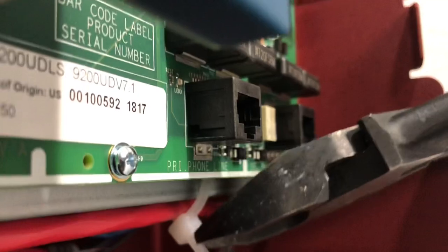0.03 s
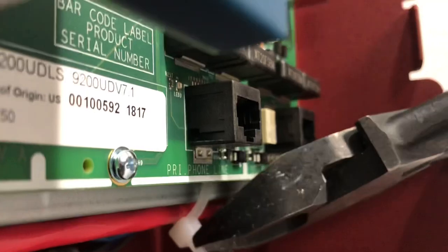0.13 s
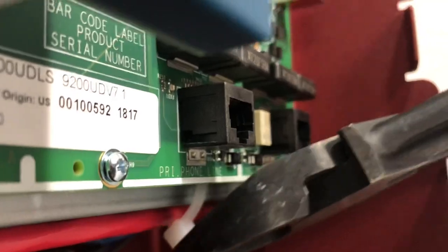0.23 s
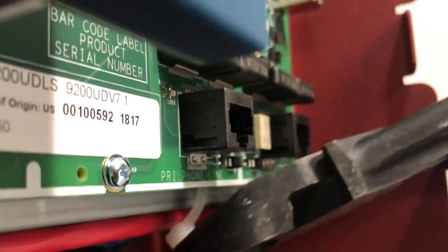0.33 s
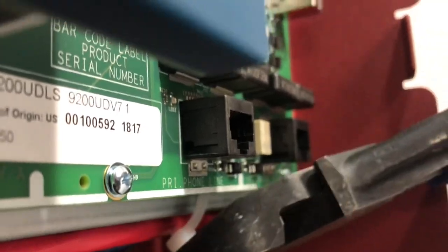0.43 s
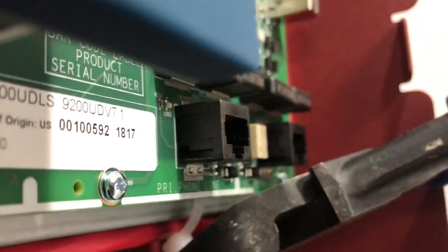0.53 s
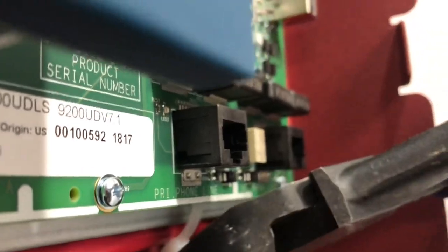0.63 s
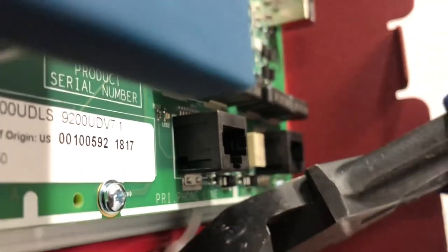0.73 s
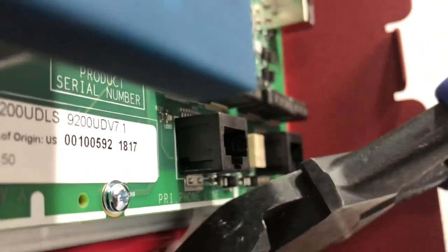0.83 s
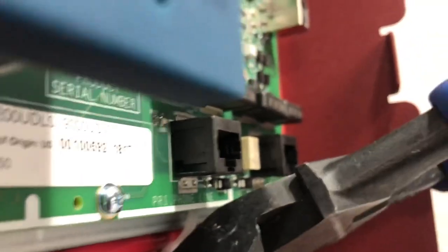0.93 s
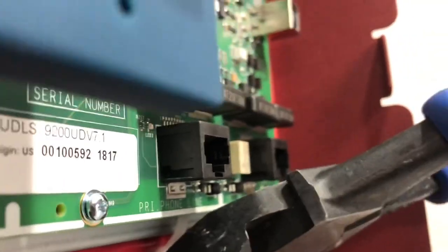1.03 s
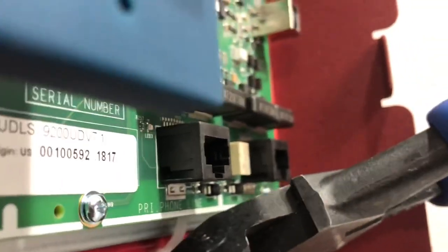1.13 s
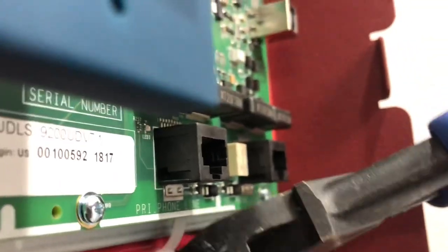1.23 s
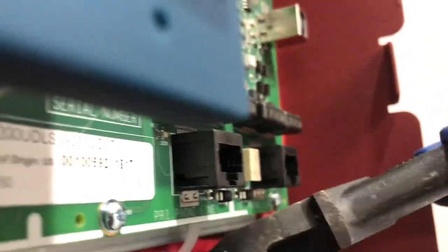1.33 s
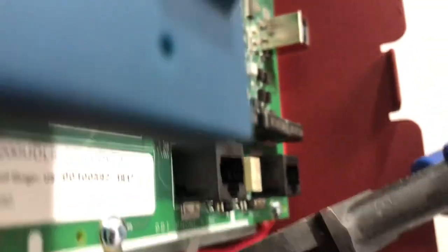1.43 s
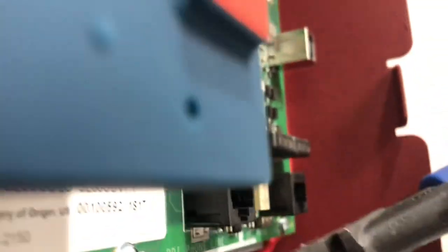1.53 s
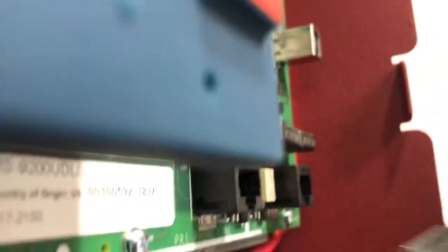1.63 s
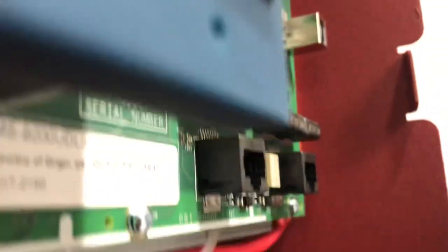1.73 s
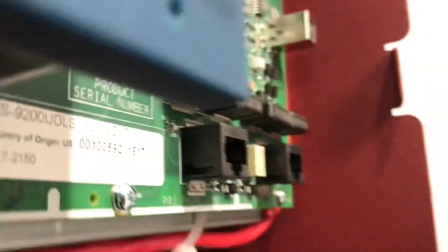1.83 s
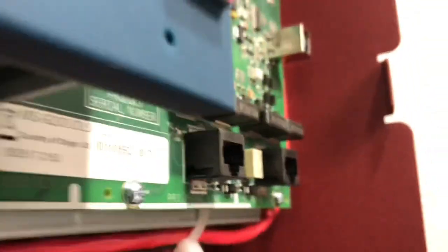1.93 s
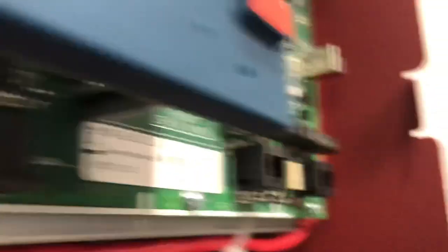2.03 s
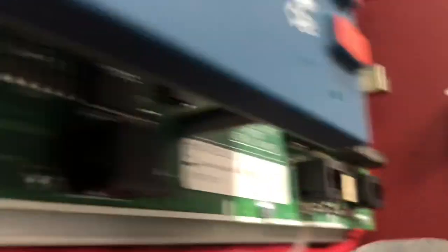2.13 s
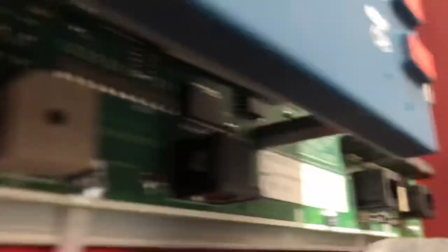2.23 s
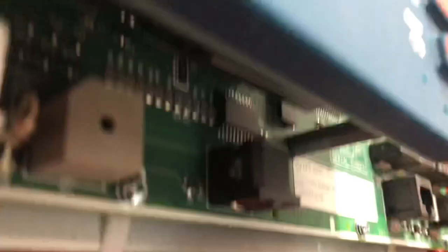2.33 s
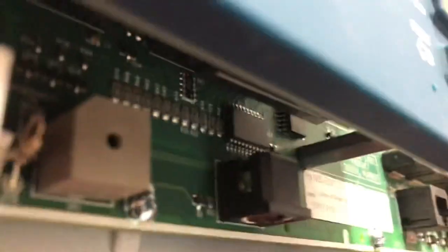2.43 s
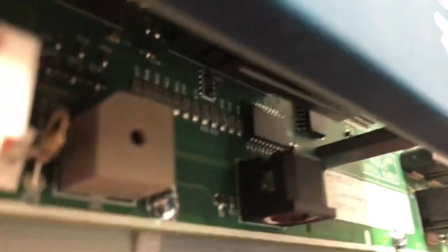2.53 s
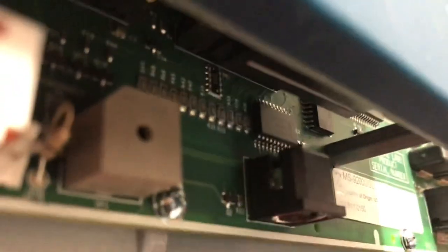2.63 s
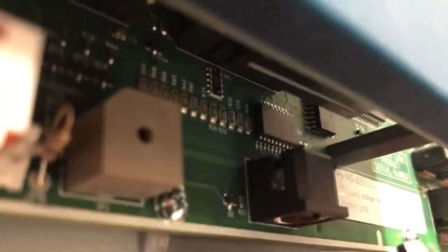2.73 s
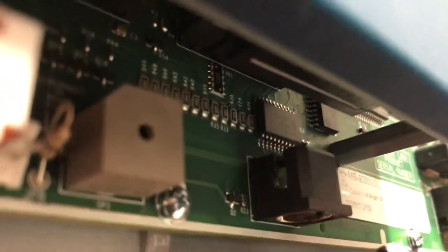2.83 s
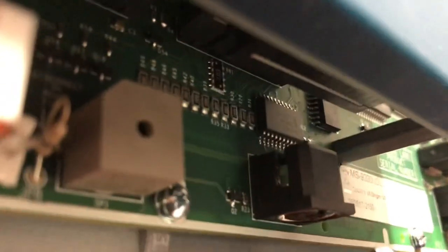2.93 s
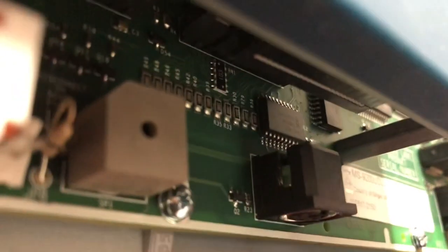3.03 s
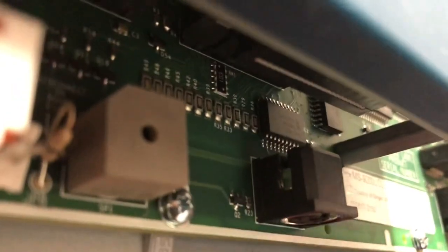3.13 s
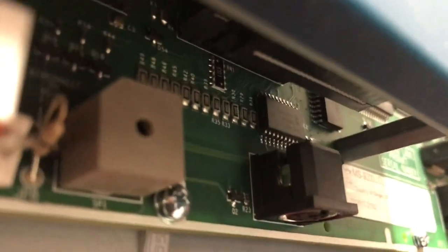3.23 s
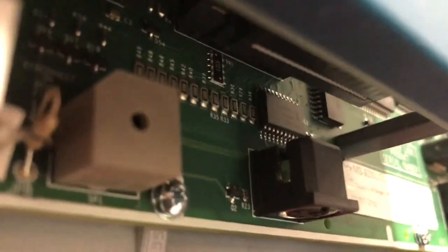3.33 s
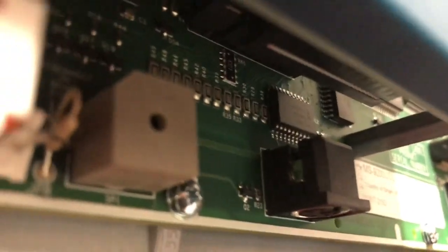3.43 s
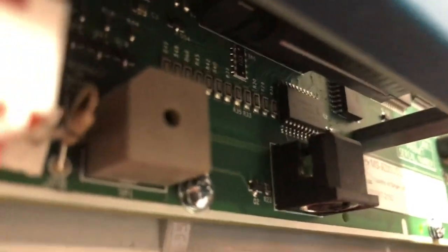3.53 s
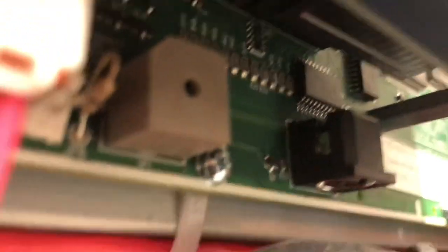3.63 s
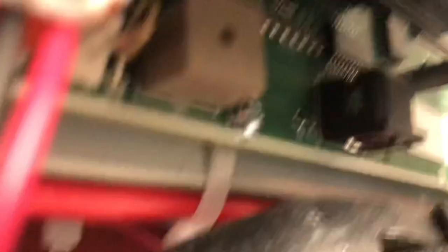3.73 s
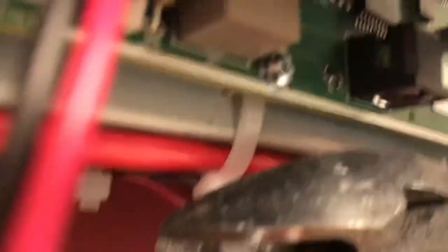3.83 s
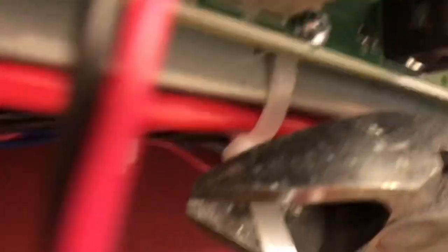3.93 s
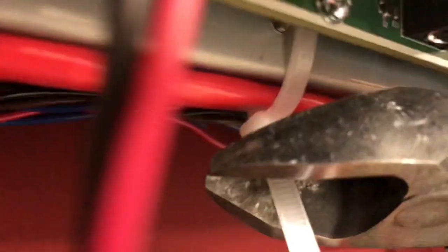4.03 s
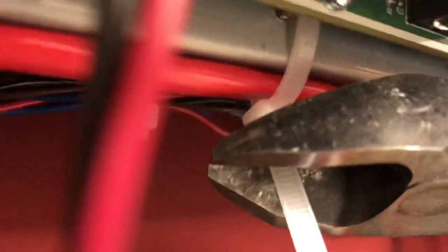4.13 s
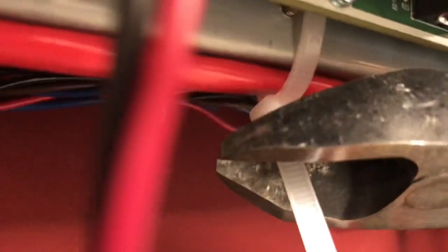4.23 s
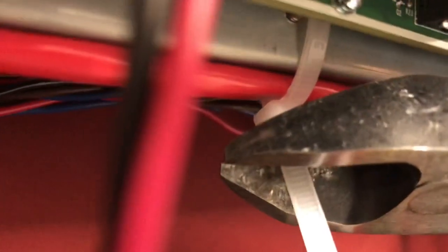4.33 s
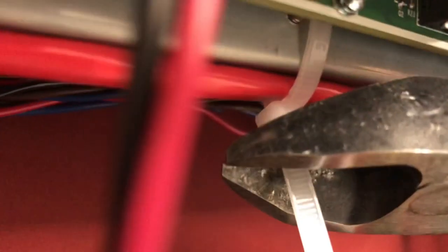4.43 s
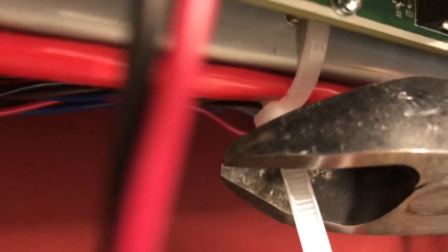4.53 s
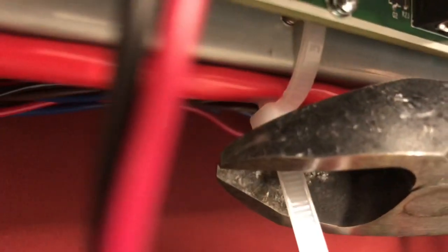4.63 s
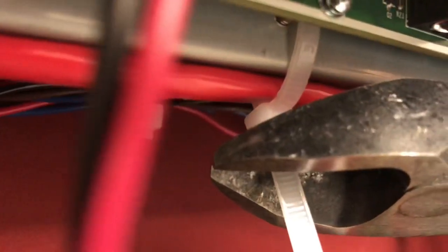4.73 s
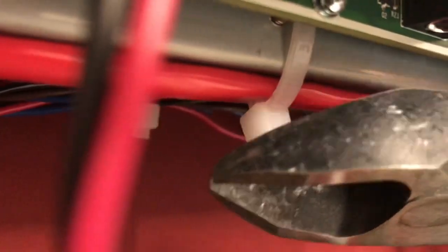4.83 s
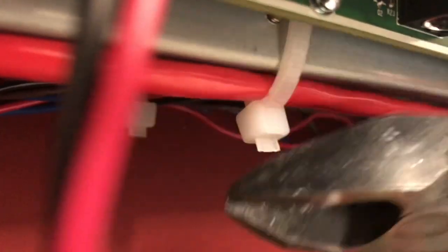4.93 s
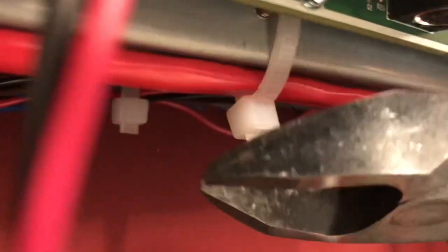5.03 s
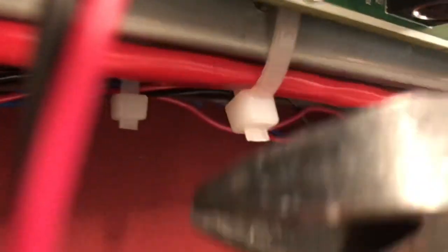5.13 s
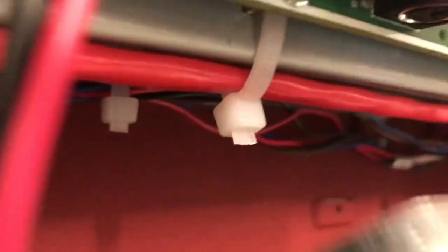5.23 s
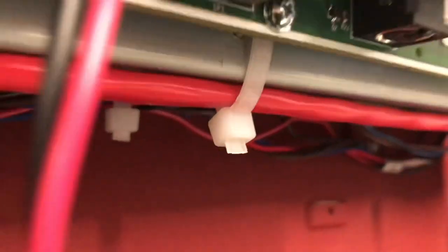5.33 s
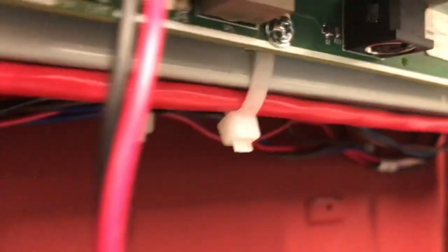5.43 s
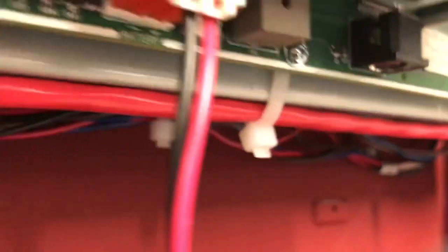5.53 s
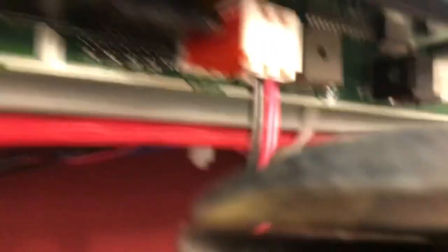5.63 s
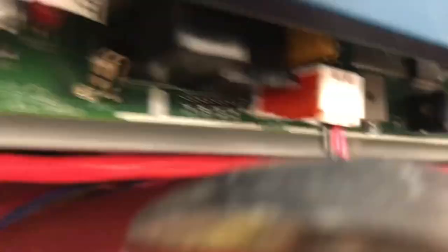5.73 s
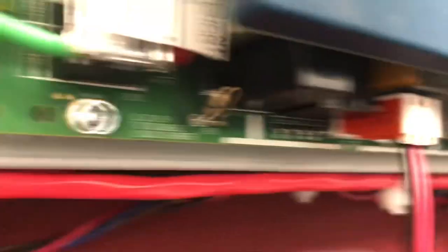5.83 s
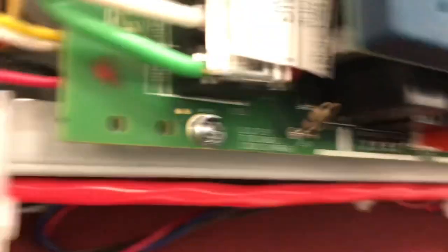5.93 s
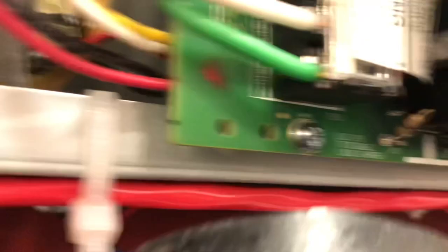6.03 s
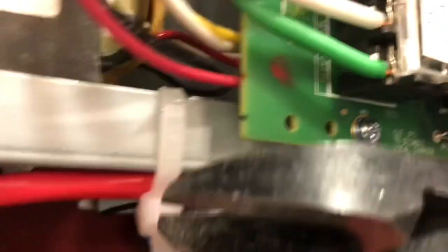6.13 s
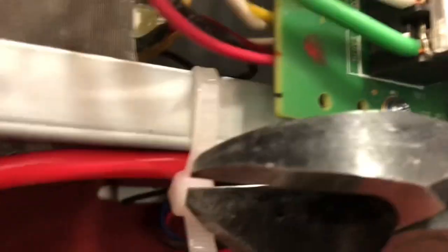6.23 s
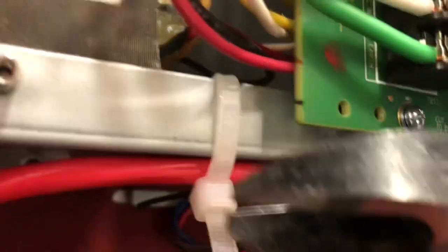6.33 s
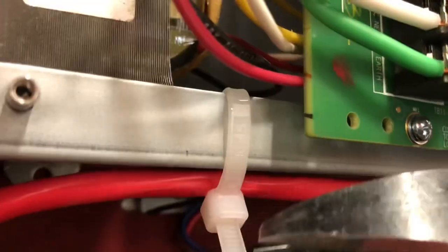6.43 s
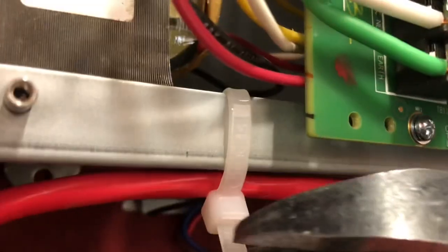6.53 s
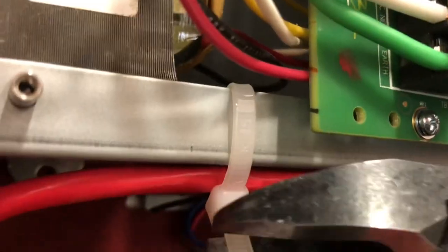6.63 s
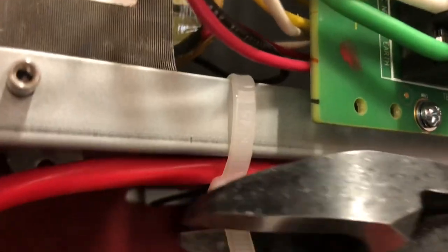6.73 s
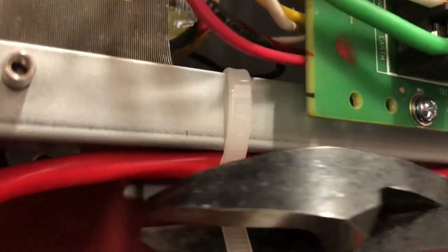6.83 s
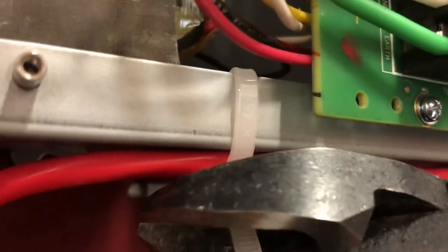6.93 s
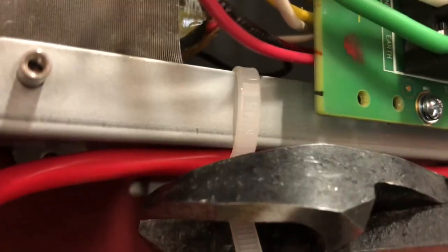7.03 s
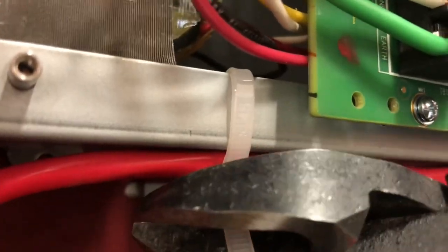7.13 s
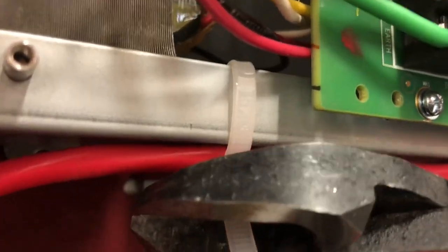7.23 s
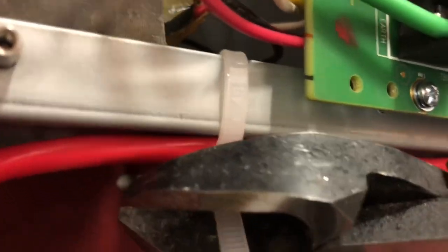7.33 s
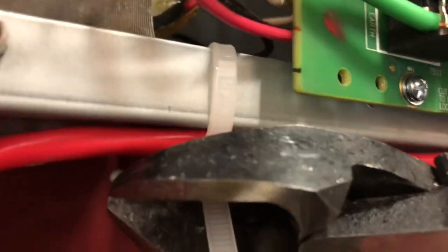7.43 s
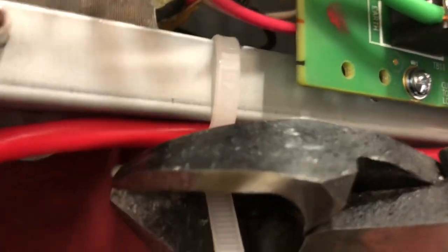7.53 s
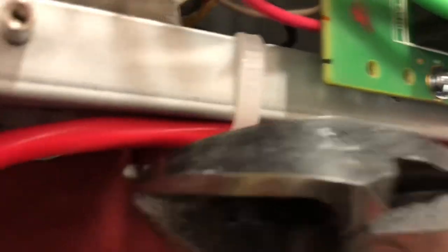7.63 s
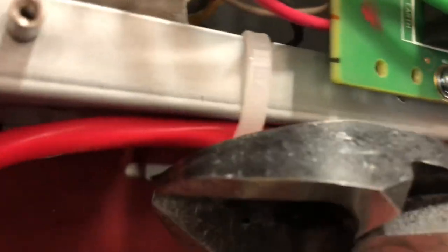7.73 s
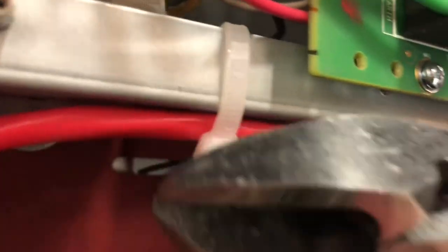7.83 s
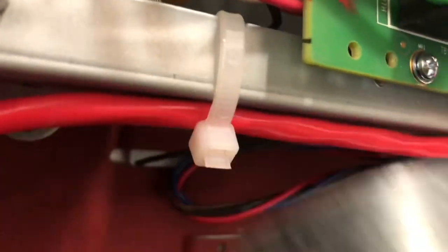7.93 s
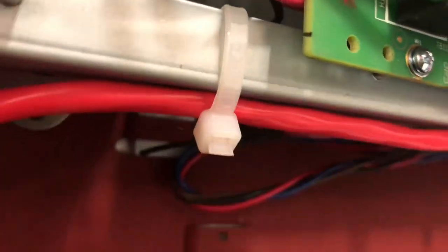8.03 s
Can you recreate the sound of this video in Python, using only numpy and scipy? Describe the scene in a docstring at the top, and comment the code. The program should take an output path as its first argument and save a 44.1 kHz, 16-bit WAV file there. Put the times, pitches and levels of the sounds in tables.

```python
"""Three nylon cable ties snap under side cutters inside a steel cabinet: short falling chirps plus torn noise
drive the resonances of strap and jaws. The freed bundle lands as noise thumps and rings the metal.
Between cuts, damped modes and noise bursts make bumps, knocks and ticks; shaped noise makes scrapes and rubs.
Ventilation noise and hum lie behind. A gain control ducks whenever the level is too high, as at a snap,
and recovers slowly."""
import sys
import numpy as np
from scipy import signal
from scipy.fft import rfft, irfft, next_fast_len
from scipy.io import wavfile
from scipy.ndimage import uniform_filter1d, map_coordinates

SR = 44100
rng = np.random.default_rng(int(sys.argv[2]) if len(sys.argv) > 2 else 0)


def master(y):
    """Save y as 16-bit WAV."""
    cut = np.clip(np.atleast_2d(y).T, -1, 1)
    pcm = np.round(cut * 32767)  # scale
    wavfile.write(sys.argv[1], SR, pcm.astype(np.int16))


N = 356019
CLOCK = np.arange(N) / SR  # scene time, s
AGE = np.arange(SR // 2) / SR  # time since a blow, s

# Levels are relative: each layer adds its own trim. t60 is the time to fall by 60 dB.
# Snaps
# ties cut [t/s, snap level/dB, tearing level/dB, tearing t60/s, strap level/dB, blade f/Hz, blade level/dB,
#           whine f/Hz, whine level/dB]
CUTS = [(1.3906, 7, -5.5, .003, 1, 7570, 2, 2834, -30.5),
        (4.7931, 3.5, 1.5, 0.00964, -2.5, 7110, 0, 3122, -32.5),
        (7.5823, 3.5, -2.5, 0.011, 3, 7240, 2.5, 3112, -31)]
# faint ticks ahead of every snap [lead t/s, level/dB re the snap]
LEAD_TICKS = [(.0231, -30.5), (.0113, -39)]
# resonances of the cut strap [f/Hz, width/Hz before the least width is applied,
#                              level/dB before each cut's offset]
STRAP_RESONANCES = [(2240, 720, -13.5), (3430, 1900, -14.5), (4200, 630, -8), (4700, 400, -4.5),
                    (5170, 780, -5)]
# the jaws' fixed resonances [f/Hz, width/Hz, level/dB]
JAW_RESONANCES = [(6333, 700, -3.5), (9900, 720, -12), (14000, 5300, -15.5)]
# colour of a snap as it reaches the room [f/Hz, level/dB per Hz]
SNAP_SPRAY_SPECTRUM = [(300, -6), (1500, -0.5), (3000, -5.5), (4600, -4.5), (5800, -1), (7200, -2),
                       (9000, -2), (11000, -5.5), (13000, -6), (16000, -11.5)]
BREAK_S = .0007  # the break runs through the strap, its treble first
BLADE_WIDTH_HZ = 910  # the blades' main resonance, which shifts with the grip
NEAR_WALL_S, NEAR_WALL_DB = .0028, -16  # the cabinet's side throws each crack back
JAW_CLACK_S, JAW_CLACK_DB, JAW_CLACK_T60 = 4.871, -18, 0.024  # the jaws shut once after the second cut
WHINE_RISE_T60, WHINE_FALL_T60 = 0.032, .06  # s

# Recoils
# the freed bundle lands after each cut [flight t/s, thump level/dB, clank level/dB, rail level/dB,
#                                        back plate level/dB, shove level/dB]
RECOILS = [(0.016, -22.5, -22.5, -38.5, -20.5, -32.5), (0.0185, -26, -19.5, -23, -25.5, -55),
           (0.017, -17.5, -23.5, -28.5, -29, -28.5)]
# dull landing of the bundle [f/Hz, level/dB per Hz]
THUMP_SPECTRUM = [(25, -18), (60, 1), (140, 4.5), (320, 1), (450, -5), (600, -1.5), (800, -15),
                  (2000, -25.5), (8000, -59.5)]
# clank on metal [f/Hz, level/dB per Hz]
CLANK_SPECTRUM = [(200, -20.5), (600, 1.5), (850, -8), (1230, 5), (1500, -5.5), (2300, -13), (3200, -12.5),
                  (4200, -23), (12000, -40)]
# mounting rail modes [f/Hz, level/dB, t60/s]
RAIL_MODES = [(543, -8.5, 0.29), (622, -6.5, 0.22), (856, -6.5, 0.15), (1117, -3, 0.078), (1255, 1.5, 0.17),
              (1400, -1.5, 0.061), (1635, -5.5, 0.14), (1993, -12, 0.11), (2180, -9, 0.13),
              (2395, -15.5, 0.16), (3230, -8.5, 0.098)]
# steel back plate modes [f/Hz, level/dB, t60/s]
PLATE_MODES = [(318.8, -2, .2), (384, -6.5, 0.068), (510, -7, 0.045), (566, -9.5, .14), (649, -6, .13),
               (885, -10.5, 0.076)]
# the whole cabinet gives as the bundle lands [f/Hz, level/dB, t60/s]
SHOVE_MODES = [(63, 1.5, 0.14), (42, -5, .15), (128, -1, 0.28)]
JOLT_DB = -3.5  # the jolt at the moment of the cut, re the bundle's landing

# Bumps on the cabinet
# blows [t/s, body level/dB, boom level/dB, boom ring time re an untouched wall, back plate level/dB,
#        clack level/dB, tick level/dB]
BUMPS = [(0.001, -30, -32.5, 1, -38, -34, -30), (0.028, -41, -42, 0.6, -38, -43, -51),
         (0.1, -52, -36.5, .3, -52, -58, -62), (0.13, -40, -43, .5, -41, -60, -62),
         (0.17, -32.5, -38.5, 0.57, -26.5, -40, -43), (0.183, -33, -32.5, 0.51, -43, -53, -49),
         (0.244, -36, -38, 1, -34.5, -37, -41), (0.3, -28, -34, 0.87, -25.5, -35, -34),
         (0.311, -33.5, -37, 0.92, -46, -48.5, -39), (2.115, -39, -43.5, 0.75, -60, -66, -63.5),
         (2.686, -25.5, -31.5, 0.85, -31, -21.5, -27), (2.724, -35.5, -46, 0.74, -39, -34, -50),
         (2.768, -42, -48, 0.51, -52, -51, -45.5), (2.81, -40, -40, 0.77, -53, -51, -53),
         (2.855, -47.5, -54, 0.73, -61, -50, -52.5), (5.293, -44, -58, 0.85, -65.5, -70, -55),
         (5.548, -40.5, -51.5, 0.57, -60, -39, -45), (6.127, -29, -40, 1, -37.5, -46, -49),
         (6.623, -26, -36, 0.753, -37.5, -33.5, -53), (6.659, -32, -37.5, 0.86, -50, -50, -61.5)]
# low wall modes [f/Hz, level/dB, t60/s of an untouched wall]
BOOM_MODES = [(58.7, -24, 0.95), (84.8, -13, 0.67), (120, -7, 0.51), (143.2, 1, 0.33), (180.3, -9, 0.45)]
# upper wall modes [f/Hz, level/dB, t60/s before the hand's muting]
BODY_MODES = [(211.6, 4.5, 0.24), (250.5, -1.5, 0.027), (259, -6.5, 0.42), (283, -11, 0.41),
              (322.8, 1, 0.24), (365, -3.5, 0.13), (419, -7, 0.14), (541, -25.5, 0.85), (561, -18, 0.32),
              (628, -11.5, 0.092)]
# a padded blow [f/Hz, level/dB per Hz]
THUD_SPECTRUM = [(25, -30), (70, -34), (130, 13.5), (320, 1), (450, -2), (600, 0.5), (800, -16),
                 (2000, -18), (8000, -36)]
# a harder contact [f/Hz, level/dB per Hz]
CLACK_SPECTRUM = [(150, -9), (400, -3), (620, 11.5), (800, 10), (1250, 8.5), (1700, 0), (3000, -7),
                  (6000, -21), (16000, -30)]
# a small hard contact [f/Hz, level/dB per Hz]
TICK_SPECTRUM = [(300, -9), (1500, -6), (3500, -2), (6000, -3.5), (9000, -9.5), (13000, -8), (16000, -15)]
# spells when a loose part buzzes [t/s, length t/s, level/dB]
RATTLES = [(0.178, 0.045, -3), (0.253, 0.093, 3), (2.685, 0.17, 2.5), (6.124, .06, -9), (6.633, .05, -7)]
# resonances of the loose part [f/Hz, width/Hz, level/dB]
LOOSE_PART_RESONANCES = [(10850, 520, -1), (11700, 510, 0), (13100, 900, -7.5)]
REBOUND_S, REBOUND_DB = .028, -8.5  # the hand settles again, softly, after each bump
MUTING = 0.67  # the hand shortens the ring of the upper wall modes by this factor

# Board knocks, catches, clinks and ticks
# knocks on the circuit board [t/s, knock level/dB, wall boom level/dB, contact level/dB]
KNOCKS = [(3.3276, -28.5, -46, -40), (3.642, -32, -44, -46), (3.6491, -34, -38, -45),
          (3.756, -45.5, -50, -50), (3.764, -41.5, -47, -53)]
# the board on its standoffs [f/Hz, level/dB, t60/s]
BOARD_MODES = [(170, -10.5, 0.14), (220, -5, 0.091), (286, -4, 0.18), (325.3, -1, 0.17),
               (423.5, -13.5, 0.26), (565, -15, 0.17), (690, -13, 0.062), (905, 0, 0.029),
               (980, -5.5, 0.045), (1210, -10.5, 0.034), (1410, -15, 0.033), (2080, -35, 0.034)]
# steel meets the board's edge [f/Hz, level/dB per Hz]
CONTACT_SPECTRUM = [(300, -10), (900, 5), (1300, 5), (2000, -7), (3400, -13.5), (4500, -27), (12000, -42)]
# the jaws catch and jump on a tie [t/s, bundle level/dB, cutting edge level/dB, pitch re the usual]
CATCHES = [(3.914, -46, -60, 1.2), (3.9224, -38.5, -51, 0.88), (3.929, -38, -52, 1.05),
           (3.936, -48, -53, 1.04), (3.9765, -36.5, -52, 1.02), (3.989, -41.5, -57, 1.15),
           (3.994, -42, -52, .9), (4.0024, -42, -43, 1.08), (4.012, -52, -49, 0.93),
           (4.0263, -45.5, -53, 1.2), (4.069, -50, -52, 1.5), (5.52, -54, -52, 0.64),
           (5.528, -51.5, -41.5, .85), (5.925, -50, -56, 1.08)]
# the tied bundle at its usual pitch [f/Hz, level/dB, t60/s]
BUNDLE_MODES = [(435, -4, 0.095), (577, -4, 0.08), (881, -3.5, 0.061), (1110, -3, 0.036),
                (1357, -9.5, 0.062), (1640, -5.5, 0.036)]
# the cutting edge on nylon at its usual pitch [f/Hz, width/Hz, level/dB]
EDGE_RESONANCES = [(2230, 830, -3), (3600, 730, 2), (4440, 800, -4), (6000, 1500, -11)]
# steel on steel [t/s, level/dB]
CLINKS = [(4.871, -21.5), (5.2899, -54)]
# the empty jaws [f/Hz, level/dB, t60/s]
STEEL_MODES = [(5750, -8, .018), (6330, 10.5, 0.015), (7000, 1, 0.0206)]
# light clicks of jaws and ties [t/s, level/dB, ring f/Hz, ring level/dB re the click]
TICKS = [(0.063, -42.5, 7200, -1), (0.091, -49, 7400, -2), (0.1087, -50, 6980, 4),
         (0.1782, -40.5, 11700, 8.5), (0.3107, -38, 8250, 6), (0.8303, -42, 6000, -4),
         (0.8899, -44.5, 6460, 2.5), (1.847, -28, 5000, 3), (1.88, -34, 5200, 3), (1.9106, -36, 5800, 7),
         (1.9308, -30, 7000, 3), (2.1514, -49, 13000, 2), (3.646, -50, 11000, 7), (3.913, -54, 6100, 4),
         (3.926, -49, 6100, 2), (3.951, -50, 5000, 4), (3.966, -51, 5100, 5), (4.154, -47, 6500, -6),
         (4.245, -63, 5027, -10.5), (5.2893, -43, 6640, -1), (5.3081, -34, 9500, -6),
         (5.6254, -43, 9200, -7), (6.055, -51, 5500, -3), (6.583, -51.5, 7500, -1),
         (6.6186, -35, 3800, -4.5), (7.0897, -50, 7000, -8), (8.0335, -35, 3600, -1)]
TICK_RING_WIDTH_HZ, TICK_RING_T60 = 1200, .04
FAINT_TICKS_PER_S, FAINT_TICK_DB, FAINT_SPREAD_DB = 2.3, -53.5, 6.5  # the tool fidgets; spread is +/- dB

# Scrapes and rubs
# the jaws drag over a tie [t/s, length t/s, hiss level/dB, rasp level/dB, hiss brightness/dB per octave]
SCRAPES = [(0.791, 0.17, -62, -67, 3), (1.858, 0.18, -53, -73, 3.5), (2.263, 0.058, -60, -58, -0.5),
           (3.925, 0.11, -52, -55, 6), (4.031, 0.058, -57.5, -55, 3.5), (4.158, 0.02, -54.5, -51, 2),
           (5.518, 0.026, -51, -51, -3.5), (5.917, 0.024, -49.5, -46.5, 1.5), (6.264, 0.08, -55, -69, 4.5),
           (6.716, 0.18, -65.5, -56, 0.5), (7.055, 0.067, -63, -72.5, 6)]
# bright friction [f/Hz, level/dB per Hz]
HISS_SPECTRUM = [(500, -23), (1600, 1), (3500, -1), (5500, -1.5), (7500, -3.5), (9500, -7), (12000, -8),
                 (16000, -11)]
# rough friction [f/Hz, level/dB per Hz]
RASP_SPECTRUM = [(200, -14), (430, -2), (750, -8), (950, -10), (1500, -12.5), (2300, -30.5), (4000, -29),
                 (10000, -38)]
# a hand slides along the cables [t/s, length t/s, final level/dB, swell over the stroke/dB, judder/dB]
RUBS = [(0, 1.53, -67, 8, 6), (1.72, 0.65, -66, -9.5, -1), (5.226, 0.293, -52.5, 12, 1.5),
        (5.582, 0.32, -53.5, 8.5, 2.5)]
# the rubbed spot sings as the grip shifts [t/s, low f/Hz, high f/Hz]
SQUEAL_GLIDES = [(5.3, 5160, 8700), (5.56, 3400, 9000), (5.943, 3060, 9900)]
# the cable jackets' colour under the hand [f/Hz, width/Hz, level/dB]
RUBBED_RESONANCES = [(3400, 1500, 3), (4900, 900, -1.5), (9300, 1300, -2)]
RUB_ATTACK_S, RUB_RELEASE_T60 = 0.029, 0.12
JUDDER_HZ, JUDDER_BUILD_S = 78.3, 0.18  # mean stick-slip rate, and the stretch before release where it builds
RUBBED_DB, SQUEAL_DB = -6, -6.5

# Background, room and output
# ventilation noise level over time [t/s, level/dB]
AIR_LEVEL = [(0, -51), (3.1, -58), (4.3, -54), (5.3, -57.5), (8.07, -57)]
# ventilation noise colour [f/Hz, level/dB per Hz]
AIR_SPECTRUM = [(15, -55), (25, -32), (42, -11.5), (82, -3.5), (111, -2), (190, -6.5), (236, -4),
                (270, -9.5), (384, -6.5), (416, -7.5), (677, -12), (754, -16), (1260, -19.5), (2160, -27),
                (16000, -43.5)]
# hum partials [f/Hz, level/dB]
HUM_PARTIALS = [(120, -61.5), (241, -62.5), (423, -69.5)]
# resonances of the cabinet's hollow [f/Hz, width/Hz, level/dB]; passed through twice
HOLLOW_RESONANCES = [(554.8, 45, 1.5), (1240, 230, -6)]
# level of the hollow over time [t/s, level/dB]
HOLLOW_LEVEL = [(0, -64.5), (3, -74.5), (5.9, -71), (6.7, -65), (8.07, -65)]
# the room's decay [f/Hz, t60/s]
ROOM_DECAY = [(150, 1), (1000, 0.33), (3000, 0.47), (7000, 0.41), (11000, 0.23), (16000, 0.13)]
TOP_HZ, TOP_EDGE_HZ = 16400, 500  # upper band limit and the width of its slope


def snaps():
    """Each tie parts with one loud crack, just after two faint ticks; once the jaws clack shut behind it."""
    out = np.zeros(N)
    for s, db, tear_db, t60, strap_db, blade_hz, blade_db, *_ in CUTS:
        add(out, s, crack(db, tear_db, t60, strap_db, blade_hz, blade_db))
        for lead_s, lead_db in LEAD_TICKS:
            tick = crack(db + lead_db, tear_db, t60, strap_db, blade_hz, blade_db)
            add(out, s - lead_s, tick * fade(0.055))
    clack = crack(JAW_CLACK_DB, tear_db=5, t60=JAW_CLACK_T60, strap_db=1.5, blade_hz=6080, blade_db=4)
    add(out, JAW_CLACK_S, clack)
    return out


def crack(db, tear_db, t60, strap_db, blade_hz, blade_db):
    """A falling chirp and decaying tear noise ring strap and jaws; near walls, then the room, answer."""
    tear, scatter = rng.standard_normal((2, len(AGE)))
    left = np.maximum(BREAK_S - AGE, 0)
    snap = np.sin(np.pi * SR / 2 * left ** 2 / BREAK_S)  # sweeps from the top of the band to zero
    force = unit(snap) + amp(tear_db) * unit(tear * fade(t60))
    echo = amp(NEAR_WALL_DB) * np.roll(force, round(NEAR_WALL_S * SR))
    force = force + echo + amp(-7.5) * unit(scatter * fade(0.011))

    strap = np.add(STRAP_RESONANCES, [0, 0, strap_db])
    peaks = np.vstack([strap, JAW_RESONANCES, (blade_hz, BLADE_WIDTH_HZ, blade_db)])
    peaks[:, 1] = np.maximum(peaks[:, 1], SR / 100)  # no resonance is narrower than SR / 100
    direct = resonate(force, peaks)
    direct = direct / np.sqrt(np.sum(direct ** 2) / (SR / 1000))  # its energy as if within 1 ms
    tail = reverberation(noise(SNAP_SPRAY_SPECTRUM), delay=0.011, early=0.77)
    return amp(db) * (direct + amp(-28.5) * tail)


def whines():
    """A thin, wavering tone swells in the last instant before each snap and dies away after it."""
    out = np.zeros(N)
    swell = np.concatenate([fade(WHINE_RISE_T60)[::-1], fade(WHINE_FALL_T60)])
    for s, *_, hz, db in CUTS:
        phase = 2 * np.pi * hz * CLOCK + .7 * wobble(300)
        tone = amp(3.5 * wobble(330)) * np.sin(phase)
        add(out, s - AGE[-1], amp(db) * swell * tone[:len(swell)])
    return out


def recoils():
    """The cut jolts the cabinet; a moment later the released cables thump it and ring its rail and plate."""
    out = np.zeros(N)
    for (s, *_), (flight, thump_db, clank_db, rail_db, plate_db, shove_db) in zip(CUTS, RECOILS):
        for delay, db in [(0, JOLT_DB), (flight, 0)]:
            thump = amp(thump_db) * noise(THUMP_SPECTRUM) * (fade(0.043) + amp(-18.5) * fade(0.61))
            clank = amp(clank_db) * noise(CLANK_SPECTRUM) * fade(0.13)
            rail = amp(rail_db) * ring(RAIL_MODES, scatter_db=1, attack=.001)
            plate = amp(plate_db) * ring(PLATE_MODES, scatter_db=1, attack=.001)
            shove = amp(shove_db) * ring(SHOVE_MODES, scatter_db=1, attack=.002)
            blow = thump + clank + rail + plate + shove
            add(out, s + delay, amp(db) * blow * onset(0.0014))
    return out


def clinks():
    """Steel rings briefly as the jaws shut and spring open again."""
    out = np.zeros(N)
    for s, db in CLINKS:
        add(out, s, amp(db) * ring(STEEL_MODES, scatter_db=.8, attack=.0004))
    return out


def bumps():
    """Hand and tool knock the cabinet and settle: walls boom, the plate rings, hard contacts clack and tick."""
    boom, rest = np.zeros((2, N))
    muted_body = np.multiply(BODY_MODES, [1, 1, MUTING])
    for s, body_db, boom_db, ring_time, plate_db, clack_db, tick_db in BUMPS:
        walls = np.multiply(BOOM_MODES, [1, 1, ring_time])
        add(boom, s, amp(boom_db + 1.5) * ring(walls, scatter_db=0.5, attack=0.0059))
        for delay, db in [(0, body_db), (REBOUND_S, body_db + REBOUND_DB)]:
            body = amp(-9.5) * ring(muted_body, scatter_db=2.8, attack=0.0031)
            thud = amp(-8.5) * noise(THUD_SPECTRUM) * fade(0.15) * onset(0.00041)
            add(rest, s + delay, amp(db) * (body + thud))
        plate = amp(plate_db - 6) * ring(PLATE_MODES, scatter_db=1.5, attack=0.0011)
        clack = amp(clack_db - 13.5) * noise(CLACK_SPECTRUM) * fade(0.13)
        tick = amp(tick_db - 9.5) * noise(TICK_SPECTRUM) * fade(0.12)
        add(rest, s, (plate + clack + tick) * onset(0.00026))
    return boom + rest + chatter(boom)


def chatter(swing):
    """A tiny loose part is tapped on the swings of the sheet metal and rings briefly, until it settles."""
    at = signal.find_peaks(swing, distance=SR // 130)[0]
    taps = np.zeros(N)
    taps[at] = np.sqrt(np.maximum(swing[at], 0)) * amp(1.5 * rng.standard_normal(N)[at])
    looseness = np.zeros(N)
    for s, length, db in RATTLES:
        settling = np.sqrt(np.clip(1 - (CLOCK - s) / length, 0, 1))
        looseness += amp(db) * (CLOCK > s) * settling
    buzz = rng.standard_normal(len(AGE)) * fade(0.013)
    buzzing = signal.fftconvolve(taps * looseness, buzz / np.linalg.norm(buzz))[:N]
    return amp(2.0) * resonate(buzzing, LOOSE_PART_RESONANCES)


def knocks():
    """The tool knocks on the circuit board: hard contact, hollow note and soft thud; the walls boom along."""
    out = np.zeros(N)
    for s, db, boom_db, contact_db in KNOCKS:
        note = ring(BOARD_MODES, scatter_db=.8, attack=.001)
        walls = ring(BOOM_MODES, scatter_db=1, attack=.006)
        thud = amp(-8.0) * noise(THUD_SPECTRUM) * fade(0.13)
        thud = thud + amp(-4.5) * noise(THUMP_SPECTRUM) * fade(0.14)
        contact = amp(contact_db) * noise(CONTACT_SPECTRUM) * fade(0.028)
        add(out, s, amp(db) * (note + thud * onset(0.0014)) + amp(boom_db) * walls + contact)
    return out


def catches():
    """The jaws catch and jump on a tie: a dull chirp of the bundle and a bright tick of the edge, pitched anew."""
    out = np.zeros(N)
    for s, bundle_db, edge_db, pitch in CATCHES:
        bundle = ring(np.multiply(BUNDLE_MODES, [pitch, 1, 1]), scatter_db=4.0, attack=0.0018)
        bundle = bundle + amp(-6.0) * noise(RASP_SPECTRUM) * fade(0.011)
        edge_peaks = np.multiply(EDGE_RESONANCES, [pitch, 1, 1])
        edge = unit(resonate(rng.standard_normal(len(AGE)), edge_peaks)) * fade(0.024)
        add(out, s, amp(bundle_db) * bundle + amp(edge_db) * edge)
    return out


def ticks():
    """Small hard contacts of jaws and ties; fainter ones fall at random."""
    out = np.zeros(N)
    for s, db, ring_hz, ring_db in TICKS:
        add(out, s, click(db, ring_hz, ring_db))
    for place, size in rng.uniform(0, 1, (int(FAINT_TICKS_PER_S * N / SR), 2)):
        db = FAINT_TICK_DB + FAINT_SPREAD_DB * (2 * size - 1)
        add(out, place * N / SR, click(db, ring_hz=6497, ring_db=-6))
    return out


def click(db, ring_hz, ring_db):
    """One hard contact: a short noise rattle, and the brief ring of the part that was touched."""
    rattle = noise(TICK_SPECTRUM) * (fade(0.0152) + amp(-5.0) * fade(0.22))
    part = unit(resonate(rng.standard_normal(len(AGE)), [(ring_hz, TICK_RING_WIDTH_HZ, 0)]))
    return amp(db - 11.0) * (rattle + amp(ring_db) * part * fade(TICK_RING_T60))


def scrapes():
    """Steel catches and slips on the ribbed nylon: noise and grains swell and fade with each stroke."""
    out = np.zeros(N)
    for s, length, hiss_db, rasp_db, tilt_db in SCRAPES:
        stroke = np.sin(np.pi * np.minimum(AGE / length, 1))
        rasp_grains = grains(length, rate=460, centre_hz=1313, spread=0.515, cycles=6.7)
        rasp = noise(RASP_SPECTRUM) + amp(-5.0) * rasp_grains
        hiss_grains = grains(length, rate=490, centre_hz=4625, spread=0.83, cycles=25)
        hiss = noise(HISS_SPECTRUM) + amp(-15.0) * hiss_grains
        hiss = unit(filtered(hiss, lambda hz: amp(tilt_db * np.log2(hz + 1))))
        add(out, s, stroke * (amp(hiss_db - 2.0) * hiss + amp(rasp_db - 4.5) * rasp))
    return out * unit(amp(2.2 * wobble(220)))


def grains(length, rate, centre_hz, spread, cycles):
    """Tiny slips over one stroke, each ringing briefly at its own pitch."""
    out, t = np.zeros(len(AGE)), AGE[:SR // 40]
    draws = rng.standard_normal((int(rate * length) + 1, 2))
    starts = rng.uniform(0, length, len(draws))
    for s, (pitch, size) in zip(starts, draws):
        hz = min(centre_hz * np.exp(spread * pitch), SR / 3)
        decay = np.exp(-t * hz / cycles - t / 0.0074)
        add(out, s, amp(size) * np.sqrt(centre_hz / hz) * np.sin(2 * np.pi * hz * t) * decay)
    return unit(out) * np.sqrt(length / AGE[-1])  # about rms 1 within the stroke


def slide():
    """Smooth rubs under changing pressure; two gliding resonances sing along, and stick-slip can judder late."""
    slips = np.sin(2 * np.pi * np.cumsum(JUDDER_HZ * (1 + 0.13 * wobble(40))) / SR)
    pressure = np.zeros(N)
    for s, length, db, swell_db, judder_db in RUBS:
        left = s + length - CLOCK  # time until the hand lets go
        attack = np.clip((CLOCK - s) / RUB_ATTACK_S, 0, 1)
        release = np.exp(np.log(1000) * np.minimum(left, 0) / RUB_RELEASE_T60)
        grip = np.clip(2 * (1 - left / JUDDER_BUILD_S), 0, 1)
        level_db = db - swell_db * np.clip(left / length, 0, 1) + judder_db * grip * slips
        pressure += attack * release * amp(level_db)

    s, *glides = np.transpose(SQUEAL_GLIDES)
    sing = np.zeros(N)
    for hz in glides:
        sing += wobble(800) * np.sin(2 * np.pi * np.cumsum(np.interp(CLOCK, s, hz)) / SR)
    sing = amp(SQUEAL_DB) * sing * (CLOCK > s[0])
    hiss = amp(-1.5) * noise(HISS_SPECTRUM, size=N)
    jackets = amp(RUBBED_DB) * unit(resonate(rng.standard_normal(N), RUBBED_RESONANCES))
    return pressure * (hiss + jackets + sing) * amp(1.1 * wobble(300))


def background():
    """Ventilation noise that sinks, rises a little and sinks again, a slightly unsteady hum, and the hollow."""
    air = amp(.6 * wobble(6)) * patchy(noise(AIR_SPECTRUM, size=N), depth_db=.9)
    air = amp(np.interp(CLOCK, *np.transpose(AIR_LEVEL))) * air
    # the hollow's colour recedes, then comes forward
    hollow = resonate(resonate(rng.standard_normal(N), HOLLOW_RESONANCES), HOLLOW_RESONANCES)
    hollow = amp(np.interp(CLOCK, *np.transpose(HOLLOW_LEVEL))) * unit(hollow)
    hum = np.zeros(N)
    for hz, db in HUM_PARTIALS:
        hum += amp(db + wobble(3.3)) * np.sin(2 * np.pi * hz * CLOCK + .5 * wobble(5.9))
    return air + hollow + hum


def room(x):
    """The room's answer to a sound: convolution with a decaying noise tail."""
    tail = reverberation(rng.standard_normal(len(AGE)))
    return signal.fftconvolve(x, tail / np.linalg.norm(tail))[:N]


def reverberation(sound, delay=0, early=1):
    """Noise becomes a room tail, each band with its own decay; gain early holds until the far walls answer."""
    hz, t, z = signal.stft(sound, SR, nperseg=256)
    decay = np.exp(-np.log(1000) * t / along(ROOM_DECAY, hz)[:, None])
    tail = signal.istft(z * decay, SR, nperseg=256)[1][:len(AGE)]
    return tail * np.where(AGE < delay, early, 1) * (1 + fade(0.27))


def patchy(x, depth_db):
    """The colour drifts: patches of random gain in pitch and time."""
    z = signal.stft(x, nperseg=256)[2]
    field = uniform_filter1d(rng.standard_normal(z.shape), size=3, axis=0)
    field = uniform_filter1d(field, size=18, axis=1)
    return signal.istft(z * unit(amp(depth_db * unit(field))), nperseg=256)[1][:N]


def ring(modes, scatter_db, attack):
    """Damped modes; every blow lands elsewhere and shares its energy differently."""
    hz, db, t60 = np.transpose(modes)[:, :, None]
    size, detune, phase = rng.standard_normal((3, len(modes), 1))
    waves = np.sin(2 * np.pi * hz * (1 + 0.014 * detune) * AGE + np.pi * phase)
    return (amp(db + scatter_db * size) * fade(t60) * waves).sum(0) * onset(attack)


def resonate(x, peaks):
    """x through parallel band-pass resonances (Hz, width, dB)."""
    def response(f):
        total = 0
        for k, (centre, width, db) in enumerate(peaks):
            damping = 1j * f * width
            # alternate signs
            total = total + (-1) ** k * amp(db) * damping / (centre ** 2 - f ** 2 + damping)
        return total
    return filtered(x, response)


def noise(spectrum, size=len(AGE)):
    """Coloured noise of rms 1."""
    return unit(filtered(rng.standard_normal(size), lambda hz: amp(along(spectrum, hz))))


def filtered(x, response):
    """x times a response of frequency."""
    m = next_fast_len(len(x) + 8192)
    return irfft(rfft(x, m) * response(np.fft.rfftfreq(m, 1 / SR)), m)[:len(x)]


def wobble(rate):
    """A smooth random curve, rate knots a second."""
    return map_coordinates(rng.standard_normal(int(N * rate / SR) + 4), [CLOCK * rate])


def fade(t60):
    """Exponential decay after a blow."""
    return np.exp(-np.log(1000) * AGE / t60)


def onset(attack):
    """Exponential rise at a blow, with time constant attack in seconds."""
    return 1 - np.exp(-AGE / attack)


def add(track, s, sound):
    """Mix a sound in at time s."""
    start = max(round(s * SR), 0)
    part = track[start:start + len(sound)]
    part += sound[:len(part)]


def along(points, hz):
    """(Hz, value) points on a log axis."""
    f, v = np.transpose(points)
    return np.interp(np.log(hz + 1), np.log(f + 1), v)


def unit(x):
    """Scale to rms 1."""
    return x / np.sqrt(np.mean(x ** 2) + 1e-20)


def amp(db):
    """Decibels to gain."""
    return 10 ** (np.asarray(db) / 20)


def scene():
    """Cuts and handling in the room, over its background."""
    thumps = recoils()
    friction = patchy(scrapes() + slide(), depth_db=1.6)
    handling = bumps() + knocks() + catches() + ticks() + friction
    wet = room(amp(-15.0) * thumps + amp(-10.5) * handling)
    return (snaps() + whines() + clinks() + thumps + handling + wet + background())[None]


def gain_control(x, ceiling_db, release_db):
    """The gain drops at once when the level passes the ceiling and creeps back at release_db a second."""
    level_db = 10 * np.log10(np.abs(uniform_filter1d(x ** 2, size=132)) + 1e-12)
    over_db = np.maximum(level_db - ceiling_db, 0)
    recovered_db = release_db * CLOCK
    cut_db = np.maximum.accumulate(over_db + recovered_db) - recovered_db
    return x * amp(-uniform_filter1d(cut_db, size=32))


def record(dry):
    """Gain control, a soft clip that levels off at 0.9 of full scale, then the upper band limit."""
    x = gain_control(dry[0], ceiling_db=-12.5, release_db=9.5)
    x = x / (1 + np.abs(x / .9) ** 6) ** (1 / 6)
    return filtered(x, lambda hz: np.clip((TOP_HZ - hz) / TOP_EDGE_HZ, 0, 1))[None]


dry = scene()
out = record(dry)
master(out)
```